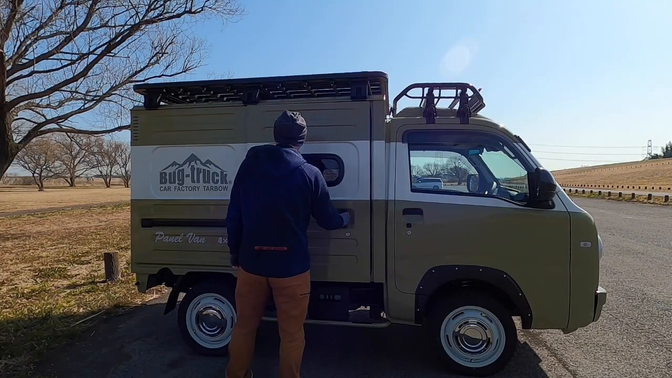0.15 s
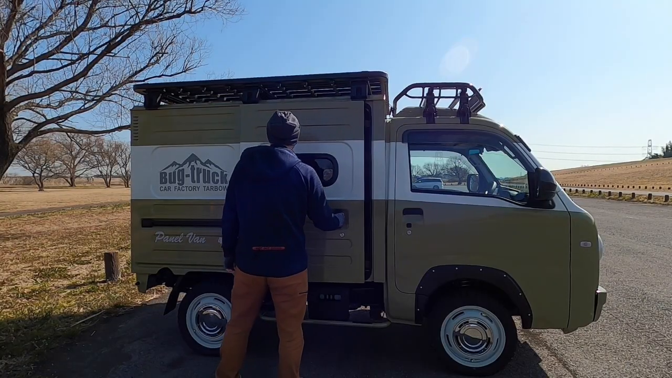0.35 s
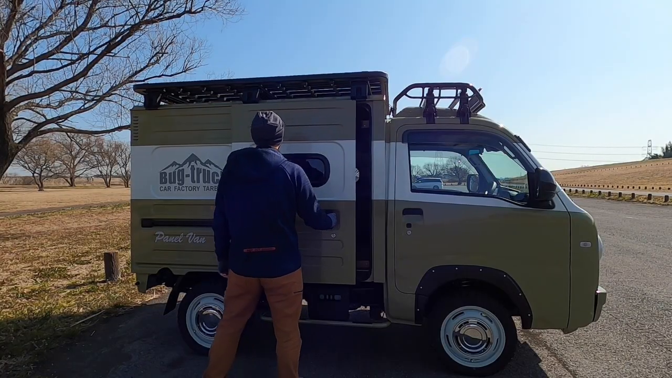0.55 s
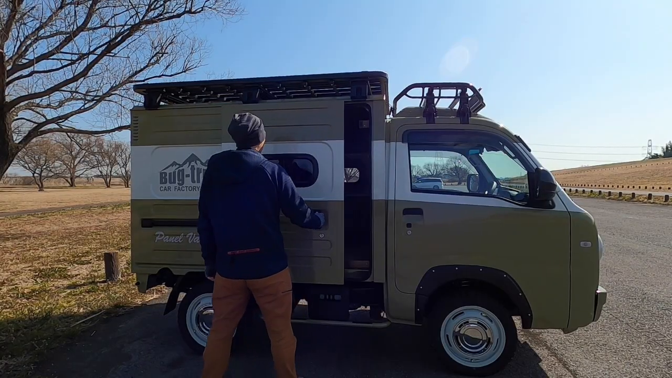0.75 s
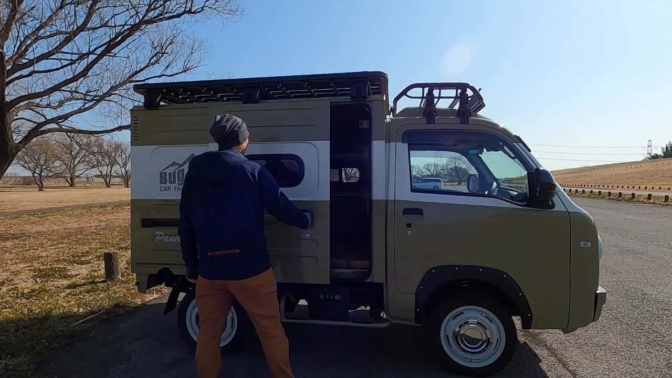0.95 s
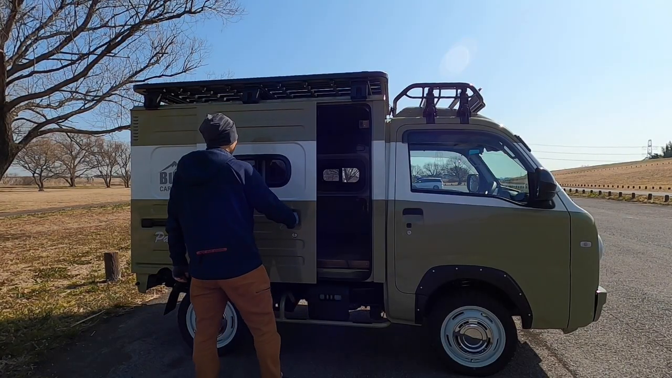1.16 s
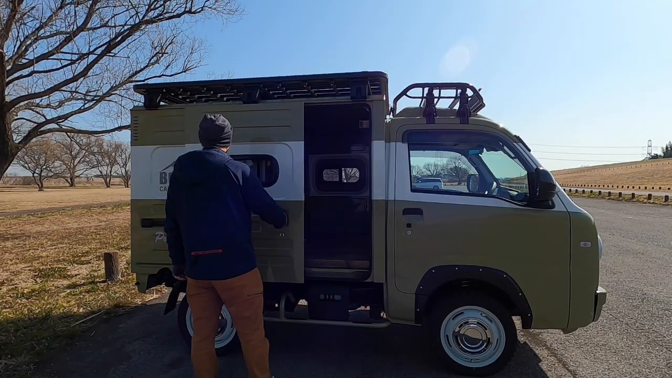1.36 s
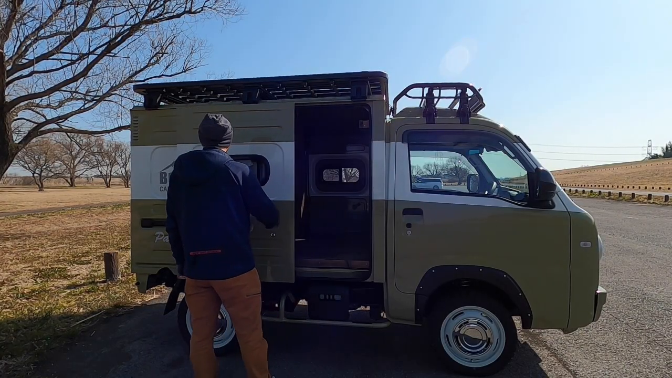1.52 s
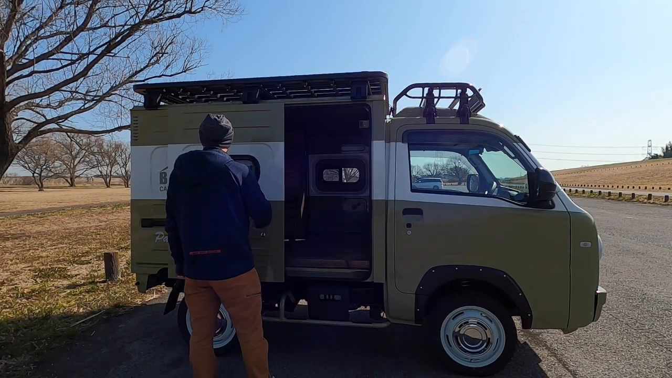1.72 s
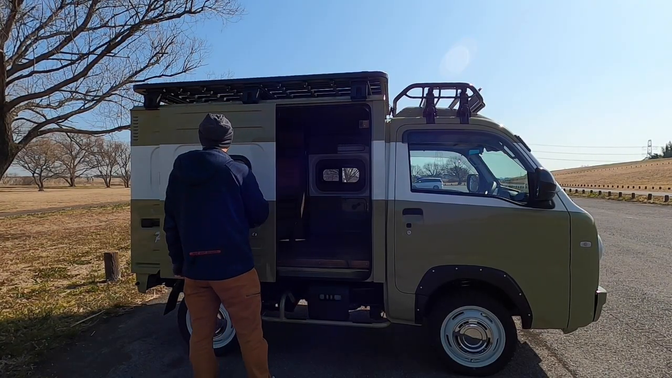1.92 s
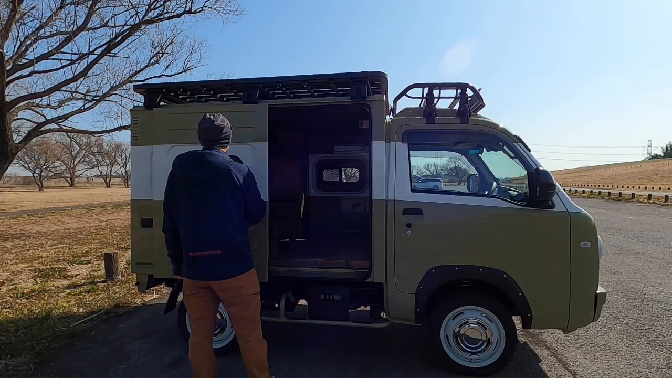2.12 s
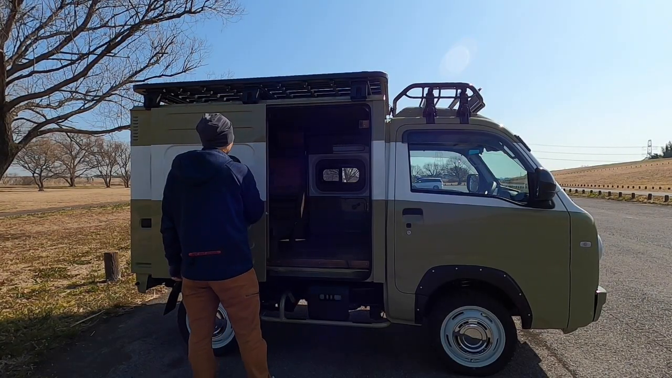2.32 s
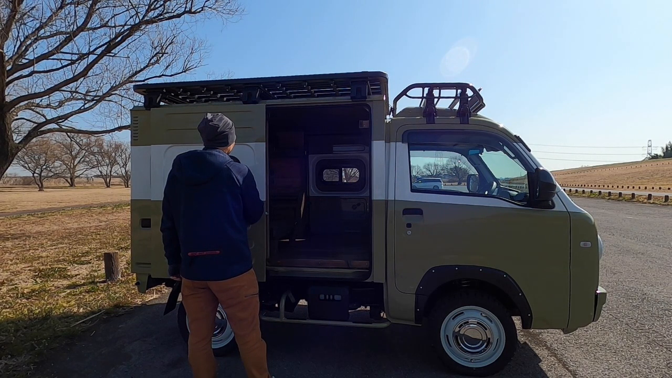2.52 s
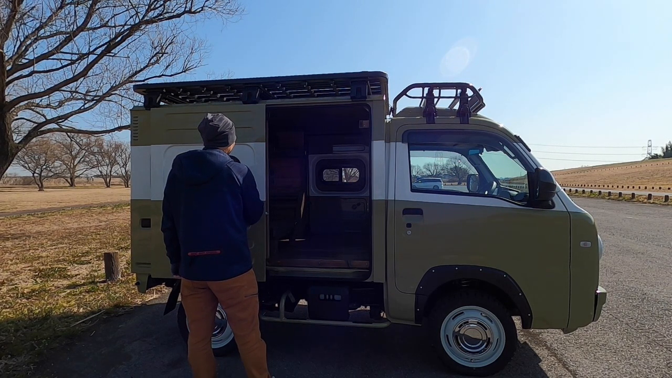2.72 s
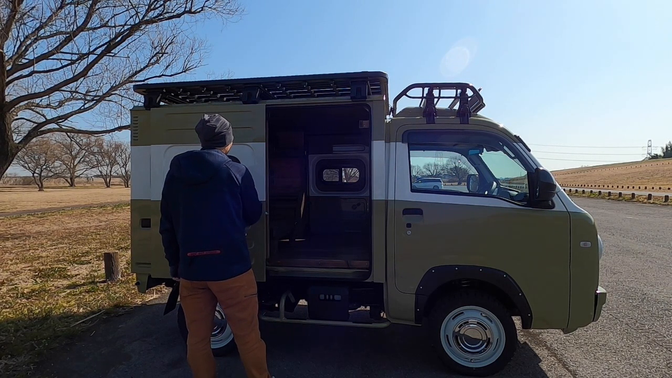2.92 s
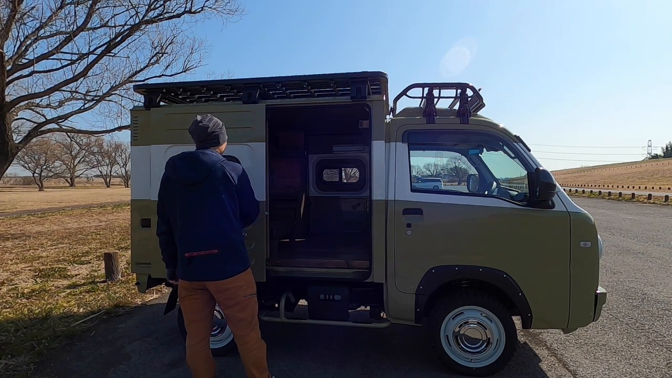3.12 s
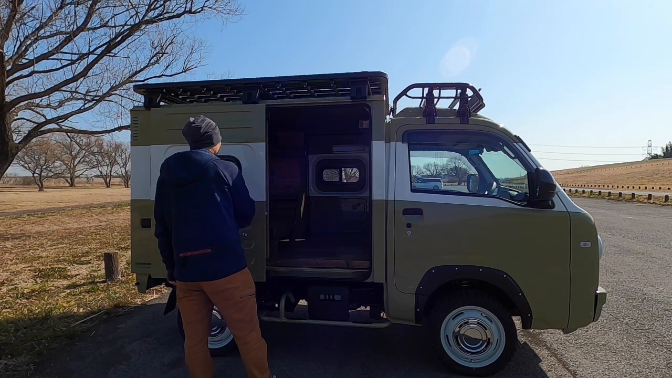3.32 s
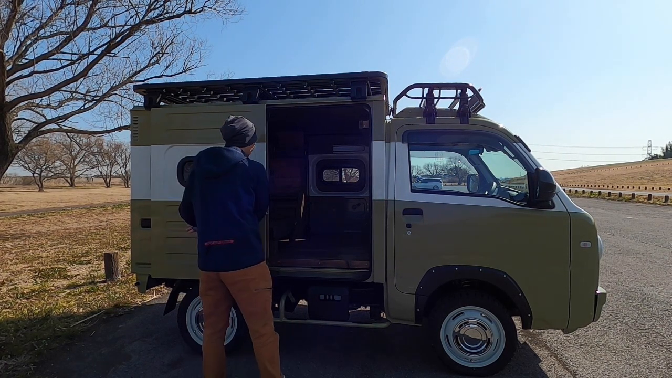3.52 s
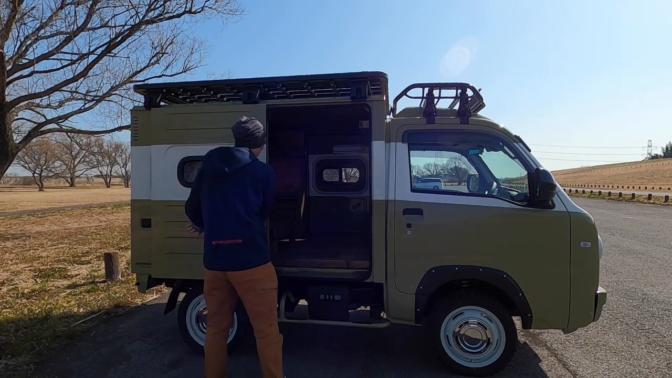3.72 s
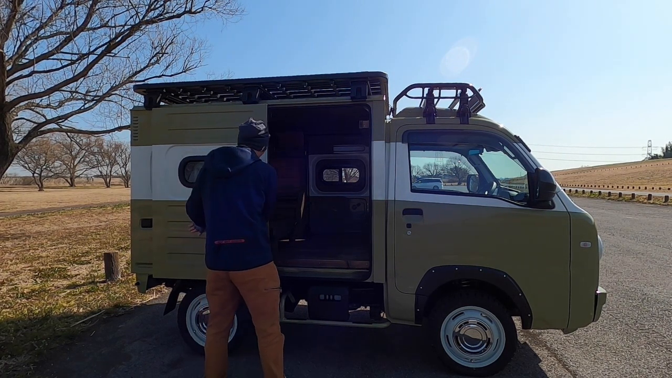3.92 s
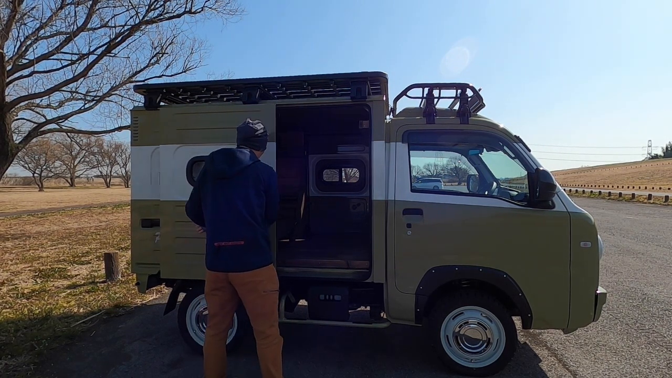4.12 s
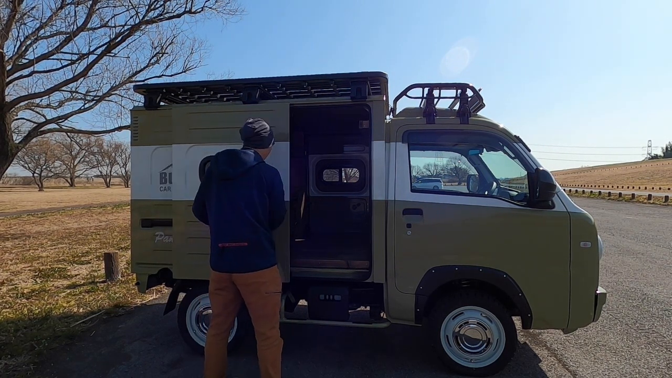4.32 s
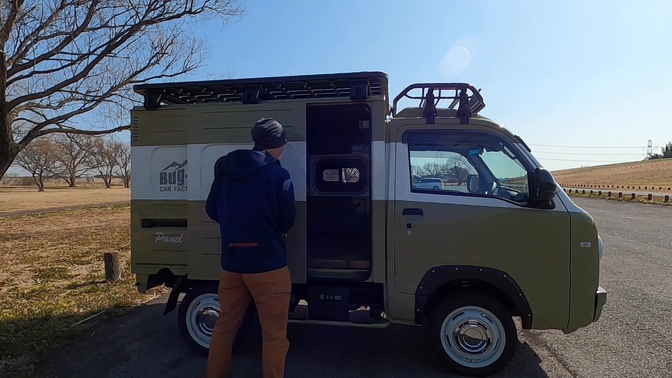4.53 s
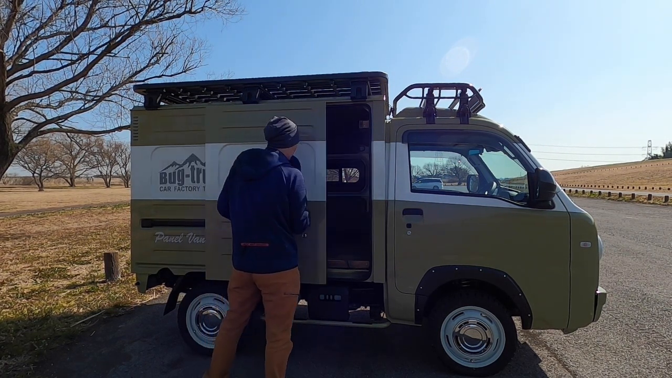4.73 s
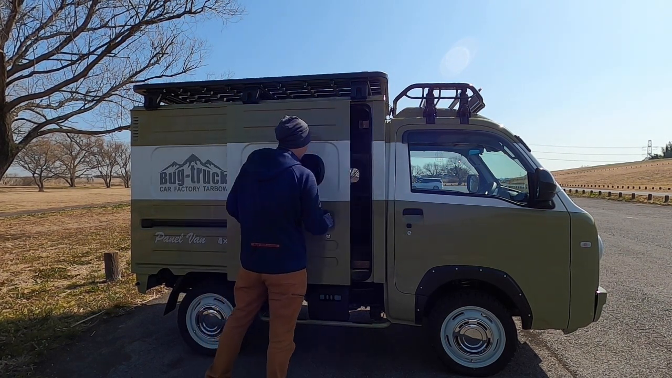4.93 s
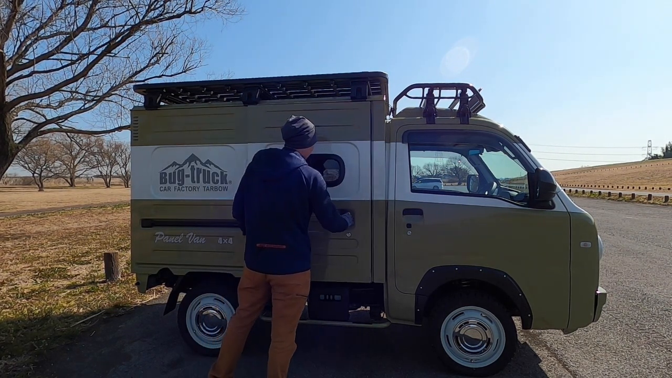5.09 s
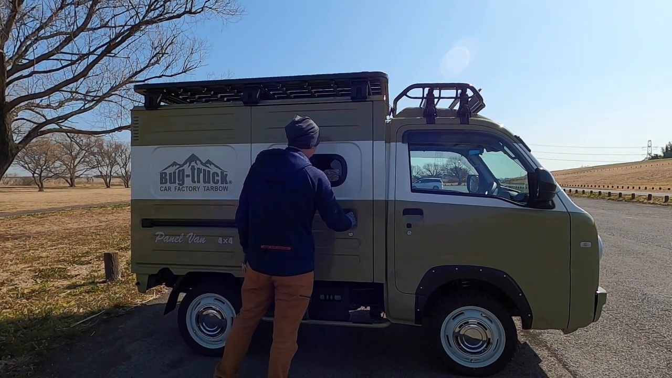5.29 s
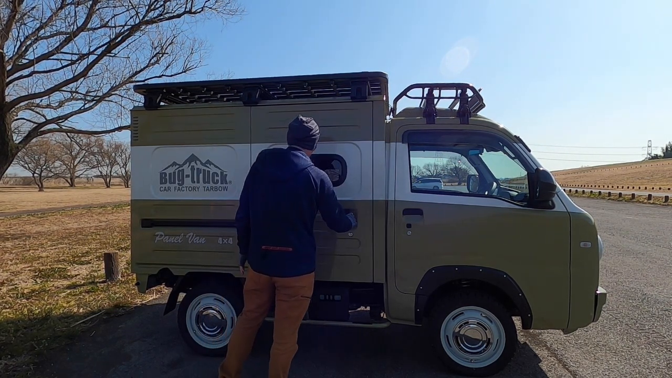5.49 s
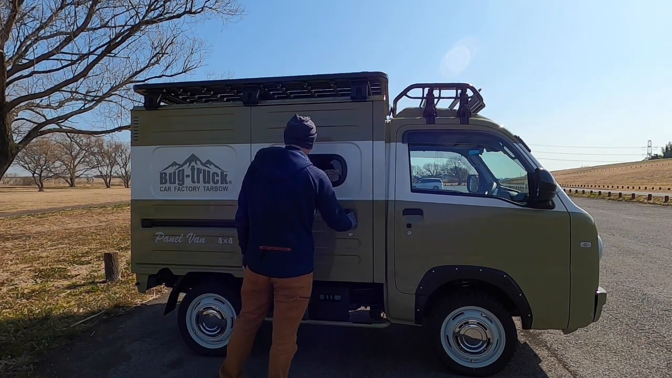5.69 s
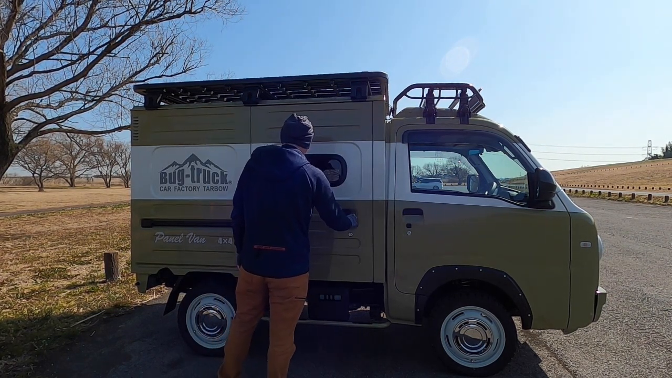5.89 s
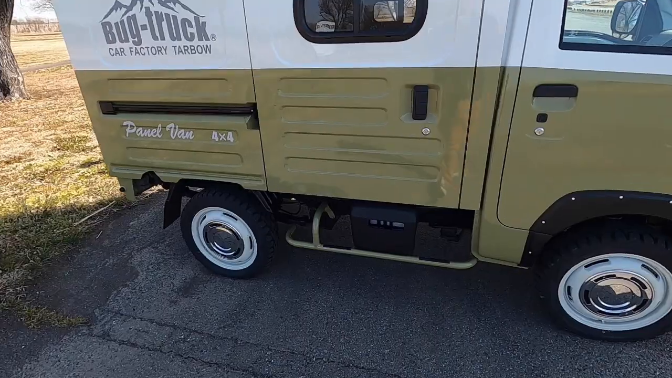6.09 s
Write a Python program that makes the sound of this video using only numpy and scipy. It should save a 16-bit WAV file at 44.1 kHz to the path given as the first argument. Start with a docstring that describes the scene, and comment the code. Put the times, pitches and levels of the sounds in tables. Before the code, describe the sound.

A van's sliding door unlatches, rolls open and knocks against its stop, then rolls back and slams shut over low wind.

```python
"""An open park, a few metres from the steel sliding door of a small van.
The latch lets go, the door rolls back and knocks into its stop; then it rolls forward faster and slams.
Impacts excite the modes of the door and the air in the cargo box; the rollers drive those of the rail.
A jacket rustles, two dry ticks sound, and two faint calls, probably a far bird, follow the slam.
Low wind, a far road and an engine hum lie underneath; a faint hiss enters at the very end."""
import sys
import numpy as np
from scipy import signal
from scipy.fft import rfft, irfft
from scipy.io import wavfile
from scipy.ndimage import uniform_filter1d, map_coordinates

SR = 44100
rng = np.random.default_rng(int(sys.argv[2]) if len(sys.argv) > 2 else 0)


def store_pcm(level_fs):
    """Save levels as 16-bit WAV."""
    pcm = np.round(np.clip(level_fs, -1, 1) * 32767).astype(np.int16)
    wavfile.write(sys.argv[1], SR, np.atleast_2d(pcm).T)


N = 271215


def amp(db):
    """Converts a level in decibels to an amplitude ratio."""
    return 10 ** (np.asarray(db) / 20)


def unit_rms(x):
    """Normalises a signal to rms 1."""
    return x / np.sqrt(np.mean(x ** 2) + 1e-20)


def curve_at(points, hz):
    """Interpolates a table on a logarithmic frequency axis."""
    f, value = np.transpose(points)
    return np.interp(np.log(hz + 1), np.log(f + 1), value)


def add(mix, start_s, sound):
    """Superposition: adds a sound to the mix from start_s on."""
    part = mix[:, max(round(start_s * SR), 0):][:, :sound.shape[-1]]
    part += sound[..., :part.shape[1]]


def bin_hz(size):
    """Frequencies of the Fourier transform of size samples."""
    return np.fft.rfftfreq(size, 1 / SR)


def crossover(centres, hz):
    """Complementary bands: overlapping gains that sum to one."""
    return [np.sin(np.pi / 2 * curve_at(np.c_[centres, one], hz)) ** 2 for one in np.eye(len(centres))]


def resonance(hz, centre_hz, width_hz):
    """Lorentzian peak of height 1, with width_hz its full width at half height."""
    return 1 / (1 + (2 * (hz - centre_hz) / width_hz) ** 2)


def drift(cutoff_hz):
    """Slow random fluctuation: low-passed noise of rms 1."""
    return unit_rms(irfft(rfft(rng.standard_normal(N)) / (1 + (bin_hz(N) / cutoff_hz) ** 4), N))


# Correlation between the two microphones: frequency_hz, correlation_ratio
COHERENCE = [(30, 1), (250, 1), (1000, 0.92), (2000, 0.9), (4000, 0.91), (8000, 0.55), (13000, .7)]
def stereo_noise(gain, size, coherence=1):
    """Partial coherence: coloured noise at two microphones, less alike toward the treble."""
    correlation = np.clip(coherence * curve_at(COHERENCE, bin_hz(size)), 0, 1)
    mid, side = rfft(rng.standard_normal((2, size))) * np.sqrt([1 + correlation, 1 - correlation])
    return irfft(np.array([mid + side, mid - side]) * gain, size)


def noise_bed(spectrum, coherence=1):
    """Spectral shaping: steady stereo noise of rms 1, as long as the scene."""
    return unit_rms(stereo_noise(amp(curve_at(spectrum, bin_hz(N))), N, coherence))


# Spectrum of the wind: frequency_hz, density_db
WIND_SPECTRUM = [(11, -31.5), (18, 0.5), (54, 2), (92, -2), (123, -5.5), (151, -12.5), (189, -12.5),
                 (243, -21), (285, -28.5), (314, -25.5), (800, -56), (1040, -86), (1760, -120)]
def wind(breeze_db=-34, draught_db=4.5, gust_db=2.0):
    """Turbulence: gusty low noise, raised by the door's draught (draught_db at 1 m/s)."""
    speed = door_speed(OPENING_SPEED) + door_speed(SHUTTING_SPEED)
    level_db = breeze_db + draught_db * speed ** 2 + gust_db * drift(54)
    return noise_bed(WIND_SPECTRUM, coherence=0.97) * amp(level_db)


# Spectrum of distant traffic: frequency_hz, density_db
ROAD_SPECTRUM = [(400, -1.5), (750, -9.5), (1100, 2), (1500, -1.5), (2100, -9), (3000, -20), (4500, -29.5),
                 (8000, -37), (15000, -49.5)]
# Traffic coming and going: time_s, level_db
ROAD_ENVELOPE = [(0, -59.5), (3.3, -61), (3.6, -56), (5.7, -65), (5.93, -64), (5.96, -70.5), (6.15, -70.5)]
def far_road():
    """Broadband traffic noise under a slowly changing envelope."""
    level_db = np.interp(np.arange(N) / SR, *np.transpose(ROAD_ENVELOPE))
    return noise_bed(ROAD_SPECTRUM) * amp(level_db)


# Harmonics of the engine: pitch_hz, relative_db
ENGINE_HARMONICS = [(61.2, -16), (122.4, 3.5), (183.6, -3)]
def engine_hum(quiet_db=-53.0, loud_db=-39.0, waver=0.0054, swell_db=2):
    """A harmonic series, wavering in pitch and level; it is louder between the two ticks."""
    t = np.arange(N) / SR
    clock = np.cumsum(1 + waver * drift(10.9)) / SR
    hum = sum(amp(db + swell_db * drift(3.8)) * np.sin(2 * np.pi * hz * clock)
              for hz, db in ENGINE_HARMONICS)
    between_ticks = (t > DRY_TICKS[0][0]) & (t < DRY_TICKS[1][0])
    level_db = uniform_filter1d(np.where(between_ticks, loud_db, quiet_db), size=1500)
    return unit_rms(hum) * amp(level_db)


def damped_mode(hz, db, rise_s, t60_s):
    """Damped oscillator: a sinusoid that builds up, then falls 60 dB in t60_s."""
    t = np.arange(SR) / SR
    return amp(db - 60 * t / t60_s) * (1 - np.exp(-t / rise_s)) * np.sin(2 * np.pi * hz * t)


# Air modes of the cargo box: start_s, level_db, pitch_hz, rise_s, t60_s
BOX_BOOMS = [(0.113, -7.5, 42, 0.0097, 0.24), (0.2, -12, 31, 0.019, 0.45), (0.193, -22, 96, .008, 0.39),
             (2.286, -21.5, 50.8, 0.0036, 1), (2.345, -21, 121.7, .006, 0.18),
             (2.448, -22.5, 66.3, 0.0033, 0.83), (2.491, -25.5, 110.2, 0.0055, 0.44),
             (5.089, 0, 40.64, 0.011, 0.12), (5.233, -5, 55.2, 0.0021, 0.26),
             (5.233, -13.5, 103.6, .004, 0.23), (5.244, 1.5, 29.03, 0.051, 0.51),
             (5.276, -15.5, 75.1, .005, 0.44)]
def box_booms():
    """Cavity resonance: heavy blows pump the air enclosed in the cargo box."""
    out = np.zeros((2, N))
    for start_s, db, hz, rise_s, t60_s in BOX_BOOMS:
        add(out, start_s, damped_mode(hz, db, rise_s, t60_s))
    return out


# Decay in the thud, body, clang, clink and click bands: centre_hz, rise_s, t60_s, tail_t60_s, tail_db
BAND_DECAYS = [(253, 0.0011, 0.056, 0.5, -6.5), (650, 0.00054, 0.24, 0.35, -27),
               (1590, 0.00039, 0.15, 0.14, -32), (4300, 0.00086, 0.13, 0.16, -16.5),
               (9000, 0.00037, 0.095, 0.12, -23.5)]
# Modes of the door skin and frame: pitch_hz, level_db, t60_s
DOOR_MODES = [(118, -17, .4), (186, -18, .45), (233, -5, .3), (310, -9, .22), (380, -4, .24),
              (446, -1, .21), (613, -4, .18), (762, -12, .22), (821, -15, .2), (935, -12, .24),
              (1012, -12, .17), (1240, -8, .22), (1340, -8, .2), (1446, -8, .21), (1662, -8, .21),
              (1840, -10, .2), (2160, -14, .17), (2295, -13, .19), (2370, -13, .19), (2848, -16, .18),
              (3026, -13, .17), (3150, -14, .17), (3402, -17, .17), (3650, -19, .2)]
# Dense ringing of the steel body: frequency_hz, density_db
STEEL_SPECTRUM = [(40, -0.5), (80, -2), (150, -9.5), (260, -13), (340, -18.5), (480, -21), (620, -24.5),
                  (1000, -22.5), (1600, -16), (2100, -21.5), (3150, -23.5), (4440, -32), (7400, -48),
                  (10000, -61.5), (12000, -74), (15500, -78)]
# Timbre by part struck: thud_db, body_db, clang_db, clink_db, click_db, sheen_db, decay_ratio, crack_db
PART_TIMBRES = {"lock": (11, -2, -3.5, -18, -28, -6, 0.9, -3.5),
                "pin": (-5.5, -4.5, -2.5, 3, -4, 11, 1.2, -2),
                "seam": (-3, -6, 5.5, -6, -22, -3, 1.24, 3.5),
                "panel": (6, -12, -3.5, -15, -22, -6.5, 0.6, -11.5),
                "guide": (4.5, -10.5, -15.5, -10.5, -25, 0, 0.96, -11.5),
                "roller": (-2.5, -12.5, 2.5, -15.5, -28, 7.5, 1, -7.5),
                "latch": (0.5, 0, 0.5, -4.5, -9, -20, 0.7, 1.5),
                "joint": (-1.5, 3.5, 5, -7, -12, 3, 1.1, 12), "bump": (5, 1, -4.5, -18, -32, -4, 0.2, -7),
                "rail": (2.5, 3.5, -2, 6, -1, -26, 1.13, -0.5),
                "catch": (-1.5, -14, 6.5, -2, -6.5, -5, 1.3, -2.5),
                "tongue": (2.5, -5.5, -9, 1, -1, -22.5, 4.5, -5),
                "hook": (1, -3.5, -4, -3, -10.5, -8, 2.4, 5.5),
                "stop": (10, 5.5, 0.5, -7, -30, -4, 1.02, -2),
                "spring": (16.5, 5, -0.5, -7, -19.5, -1, 0.7, -14),
                "frame": (2.5, 1.5, 1.5, -6, -17.5, 1.5, 1.15, -0.5)}
def impact(part, strength_db, hardness_db, modes_db=-2, scatter_db=2, dense_db=7, crack_s=0.0045):
    """Impulse response: distinct modes within dense ringing, each band with a decay and a tail."""
    size, onset = SR // 3, slice(SR // 50)
    t, hz = np.arange(size) / SR, bin_hz(size)
    *colour_db, sheen_db, decay_ratio, crack_db = PART_TIMBRES[part]
    crack = 1 + amp(crack_db) * np.exp(-t / crack_s)  # metal on metal briefly stands out
    centres = np.array([row[0] for row in BAND_DECAYS])
    tilt_db = hardness_db * np.log2(centres / np.median(centres))  # a harder blow is brighter
    levels_db = strength_db + np.array(colour_db) + tilt_db

    mode_hz, mode_db, t60_s = np.transpose(DOOR_MODES)[:, :, None]
    weights = amp(mode_db + scatter_db * rng.standard_normal(mode_hz.shape))  # varies with the spot hit
    tones = np.sin(2 * np.pi * (mode_hz * t + rng.random(mode_hz.shape)))
    modes = (weights * amp(-60 * t / (t60_s * decay_ratio)) * tones).sum(0)
    mode_spectrum = rfft(amp(modes_db) * modes / modes[onset].std(), 2 * size)

    top_db = sheen_db * np.interp(hz, [7500, 11500], [0, 1])
    steel = amp(curve_at(STEEL_SPECTRUM, hz) + top_db) * hz ** 2 / (hz ** 2 + 110 ** 2)
    dense_spectrum = rfft(amp(dense_db) * unit_rms(stereo_noise(steel, size)))

    out = 0
    bands = zip(levels_db, crossover(centres, hz), crossover(centres, bin_hz(2 * size)), BAND_DECAYS)
    for level_db, band, padded_band, (_, rise_s, early_t60_s, tail_t60_s, tail_db) in bands:
        early = amp(-60 * t / (early_t60_s * decay_ratio))
        tail = amp(tail_db - 60 * t / (tail_t60_s * decay_ratio))
        dense = irfft(dense_spectrum * band) * np.hypot(early, tail)
        distinct = irfft(mode_spectrum * padded_band)[:size]
        ringing = (dense + distinct) * (1 - np.exp(-t / rise_s)) ** 2 * crack
        out = out + amp(level_db) * ringing / ringing[:, onset].std()
    return out


# Blows on the door: start_s, part, strength_db, hardness_db_per_octave
DOOR_BLOWS = [(.115, "lock", -38.5, 2.5), (.121, "lock", -37, -2), (.127, "lock", -34, -1),
              (.149, "roller", -39.5, -1), (0.178, "pin", -59, -3.5), (.187, "panel", -40, 0.5),
              (.216, "roller", -41, -2.5), (.223, "roller", -47.5, -4), (0.368, "latch", -37, 0),
              (0.3701, "latch", -35, -0.5), (0.676, "rail", -64, 1.5), (0.804, "rail", -57.5, 0.5),
              (1.157, "seam", -47.5, -2), (1.283, "guide", -43.5, -1.5), (1.402, "joint", -46, 0.5),
              (2.271, "catch", -45, 0.5), (2.318, "hook", -39, 0.5), (2.348, "pin", -59.5, -1),
              (2.392, "stop", -34, 0), (2.399, "bump", -32.5, 1.5), (2.416, "spring", -45, 1.5),
              (2.425, "spring", -43.5, 1), (2.446, "spring", -55.5, 1), (2.474, "spring", -51.5, -1),
              (2.577, "rail", -70, -3), (2.727, "seam", -65.5, -4), (4.143, "rail", -58, -4.5),
              (4.357, "rail", -60, 1.5), (4.439, "rail", -51, -2), (4.522, "rail", -53, 0.5),
              (4.682, "rail", -50.5, -2), (4.717, "seam", -47.5, 3), (4.73, "seam", -43.5, 1),
              (5.057, "tongue", -40.5, -2), (5.069, "roller", -34, -4), (5.076, "guide", -27.5, -1),
              (5.113, "rail", -33.5, -2.5), (5.231, "frame", -25.5, -3), (5.236, "frame", -25, 0.5),
              (5.247, "frame", -28.5, 2.5), (5.256, "pin", -45, 2), (5.276, "guide", -27.5, 1),
              (5.289, "pin", -51.5, 0.5), (5.327, "pin", -55.5, 0), (5.358, "frame", -51, 1.5),
              (5.372, "frame", -52.5, 1)]
# Each part's own modes: pitch_hz, above_blow_db, t60_s
FITTING_MODES = {"lock": [(120.3, 18, 0.052), (210, 19, 0.15), (307, 14.5, 0.1), (468, 15, 0.097),
                 (750, 8, 0.16), (1017, 3, 0.031), (1228, 18, 0.036)], "panel": [(119.5, 6, 0.64),
                 (215, 16, 0.083)], "guide": [(207, 14.5, 0.11), (241, 15.5, 0.14), (553, 6, 0.023)],
                 "roller": [(1696, 9, 0.041), (1890, 15.5, 0.019)], "latch": [(183, 9.5, 0.36),
                 (494, 3.5, 0.086), (630, 6.5, 0.082), (875, 1, 0.18), (1190, -7, 0.11), (1320, 16, 0.014),
                 (1508, 22, 0.013), (1700, -9.5, 0.18), (2345, 7, 0.067), (3136, 0.5, 0.068),
                 (3250, 16, 0.041), (3950, 5, 0.031), (4780, 8, 0.032), (5790, 6.5, 0.028),
                 (7200, 0.5, 0.021)], "bump": [(422, 8.5, 0.12), (650, 6.5, 0.12), (1118, 4, 0.053)],
                 "rail": [(3070, 4.5, .05), (5400, 5.5, .04), (7050, -4, .04)], "pin": [(7700, 6.5, .03)],
                 "joint": [(663, 21, 0.039), (1770, 9, 0.018), (2350, 16.5, 0.024), (2860, 2, 0.018)],
                 "catch": [(1046, 5, 0.22), (1510, -6, 0.21), (1780, 7, 0.059), (2880, 13, 0.041),
                 (3400, 4, 0.03)], "tongue": [(5400, 10, .04), (6000, 8, .04)], "hook": [(1550, 9.5, 0.2),
                 (1850, 3, 0.21), (2869, -6, .14), (3180, 3, .045)], "stop": [(540, 2, 0.064),
                 (706, 4.5, 0.16), (903, 0.5, 0.2), (1095, 8, 0.072), (1220, 7, 0.067), (1610, -7, 0.065),
                 (2420, 8.5, 0.054), (2520, 12.5, 0.023), (3630, -1.5, 0.053)],
                 "spring": [(359, 12.5, 0.32), (1937, 13.5, 0.069), (2800, 1, .06), (3570, 0.5, 0.09),
                 (3780, 1.5, 0.088), (4450, -7, 0.08), (4550, -7, 0.09)], "frame": [(119, 8.5, 0.43),
                 (237.1, 5.5, 0.28), (448.4, 4, 0.17), (1260, -1.5, .1), (1636, 1, 0.1)]}
def knocks(rise_s=0.0011):
    """Free vibration: each blow rings both the door and the part that it hits."""
    out = np.zeros((2, N))
    for start_s, part, strength_db, hardness_db in DOOR_BLOWS:
        add(out, start_s, impact(part, strength_db, hardness_db))
        for hz, db, t60_s in FITTING_MODES.get(part, []):
            add(out, start_s, damped_mode(hz, strength_db + db, rise_s, t60_s))
    return out


def door_speed(run):
    """Inertia: the door's mass smooths every change in its speed, given in m/s at each sample."""
    speed = np.interp(np.arange(N) / SR, *np.transpose(run), left=0, right=0)
    return np.maximum(uniform_filter1d(speed, size=1000), 1e-4)


def contact_noise(grit_db=-9, specks_per_s=900, spread_db=-11.5, t60_s=0.045):
    """Roughness excitation: steady noise plus a decaying burst for each crushed speck of grit."""
    crushed = rng.random(N) < specks_per_s / SR
    specks = crushed * amp(spread_db * np.minimum(rng.exponential(1, N), 3.5))
    power_decay = amp(-120 * np.arange(SR // 8) / SR / t60_s)
    burst_power = abs(signal.oaconvolve(specks ** 2, power_decay)[:N])
    return stereo_noise(1, N) * np.sqrt(1 + amp(2 * grit_db) * burst_power / burst_power.mean())


def patches(shape, size):
    """A random field of rms 1, smoothed over size = (frequency bins, time frames)."""
    kernel = np.outer(*map(signal.windows.hann, size))
    return unit_rms(signal.oaconvolve(rng.standard_normal(shape), kernel, "same"))


def wander(x, flicker_db=2.0, linger_db=1.7):
    """Moving excitation: as the rollers travel, single resonances swell and fade, some lingering."""
    hz, _, frames = signal.stft(x, SR, nperseg=1024, noverlap=768)
    depth = np.interp(hz, [250, 1200], [.25, 1])[:, None]  # the low rumble stays even
    swell_db = flicker_db * patches(frames.shape[1:], size=(7, 13))
    swell_db += linger_db * patches(frames.shape[1:], size=(5, 55))
    return signal.istft(frames * amp(depth * swell_db), nperseg=1024, noverlap=768)[1][:, :N]


def bend(x, depth=.005):
    """Frequency modulation: all resonances glide together as the load shifts along the rail."""
    position = np.arange(N) + np.cumsum(depth * drift(4))
    return np.array([map_coordinates(side, [position], order=3, mode="mirror") for side in x])


# Broad response of the rail: frequency_hz, density_db
RAIL_SPECTRUM = [(35, -26), (60, 21.5), (124, 0.5), (151, 2.5), (306, -4), (355, -7.5), (606, -12),
                 (818, -24), (1400, -35.5), (1850, -34.5), (2150, -34), (3150, -36.5), (4740, -49),
                 (6680, -49), (9500, -65.5), (10600, -78), (13000, -86.5), (22000, -120)]
# Resonances of rail and rollers: centre_hz, width_hz, boost_db
RAIL_RESONANCES = [(212, 160, 6.5), (358, 58, 2), (402, 62, 3), (673, 14, 5.5), (930, 29, 3.5),
                   (1164, 120, 6.5), (1415, 170, 9.5), (1800, 150, 7), (2300, 120, 2), (2860, 350, 3.5),
                   (2790, 120, 4), (3215, 140, 9), (3640, 110, 4.5), (4080, 190, 2), (5450, 140, 6),
                   (5870, 380, 7.5), (6630, 260, 5.5), (7660, 230, 7), (8730, 600, 7.5)]
def rail_response(hz, ripple_db=2.1, spacing_hz=32):
    """Transfer function of the rail: main peaks, rippled by the door's countless lesser resonances."""
    peaks_db = sum(db * resonance(hz, centre, width) for centre, width, db in RAIL_RESONANCES)
    grid = np.arange(0, SR / 2, spacing_hz)
    lesser_db = ripple_db * np.interp(hz, grid, rng.standard_normal(len(grid))) * hz / (hz + 200)
    high_pass = hz ** 2 / (hz ** 2 + 130 ** 2)
    return amp(curve_at(RAIL_SPECTRUM, hz) + peaks_db + lesser_db) * high_pass


# The door pulled back and left to coast, then pushed shut ever faster: time_s, speed_m_per_s
OPENING_SPEED = [(.16, 0.5), (.24, 0.35), (.3, 0.31), (.335, 0.18), (.39, 0.44), (.45, 0.29), (.56, .37),
                 (.72, 0.4), (.93, 0.55), (1.2, 0.49), (1.55, 0.42), (2.1, 0.35), (2.4, 0.37), (2.5, 0.22)]
SHUTTING_SPEED = [(3.88, 0.18), (3.98, 0.17), (4.07, 0.27), (4.12, 0.26), (4.22, 0.41), (4.33, 0.61),
                  (4.52, 0.61), (4.92, 1.2), (5.08, 1.4), (5.17, 1.1), (5.23, .97), (5.27, 0.17)]
# Rumble, growl, grind, scrape and hiss bands of the rollers: centre_hz
ROLLER_BANDS = (250, 550, 1300, 3000, 6500)
# One row a band: level_db (at 1 m/s), db_per_speed_doubling, db_per_metre_travelled
OPENING_LEVELS = [(-39.5, 1.5, 4.5), (-44, 4.5, 5.5), (-40, 8.5, -1), (-41, 13, 0.5), (-46, 14.5, -6.5)]
SHUTTING_LEVELS = [(-31, 2.1, -4), (-39, 2.7, 4.5), (-39, 7.1, 0.5), (-48, 8.2, -0.5), (-55.5, 10, -1)]
def rolling(run, band_levels, judder_db=0.92, crawl_m_per_s=0.35):
    """Forced vibration: the rollers drive the rail's resonances, louder and brighter with speed."""
    hz, speed = bin_hz(N), door_speed(run)
    travel_m = np.cumsum(speed) / SR
    response = rail_response(hz)
    force = wander(contact_noise()) * amp(judder_db * drift(22))
    spectrum = rfft(bend(irfft(rfft(force) * response, N)))
    out = 0
    for band, (db, growth_db, travel_db) in zip(crossover(ROLLER_BANDS, hz), band_levels):
        rms_above_bass = irfft(spectrum * band * (hz > 170), N).std()
        level_db = db + growth_db * np.log2(speed) + travel_db * travel_m
        out = out + irfft(spectrum * band, N) / rms_above_bass * amp(level_db)
    return out / np.hypot(1, (crawl_m_per_s / speed) ** 4)  # below a crawl the rollers fall silent


# Shaking after the heavy blows: start_s, level_db, hardness_db_per_octave, t60_s
DOOR_RATTLES = [(.21, -51.5, -0.5, 0.39), (2.43, -54, -0.5, 0.61), (5.292, -45.5, 1, 0.35)]
def rattles(knocks_per_s=170, count=80, uneven_db=3):
    """Repeated impact: the door shakes in its fittings, a dying run of uneven knocks on the panel."""
    out = np.zeros((2, N))
    for start_s, db, hardness_db, t60_s in DOOR_RATTLES:
        delays = (np.arange(count) + rng.random(count)) / knocks_per_s
        signs = rng.choice([-1, 1], count)
        sizes = signs * amp(uneven_db * rng.standard_normal(count) - 60 * delays / t60_s)
        knock = impact("panel", db, hardness_db)
        for delay, size in zip(delays, sizes):
            add(out, start_s + delay, size * knock)
    return out


# Swells of noise: peak_s, timbre, level_db, swell_s, t60_s The ones at 0.367 s and 5.228 s are brief swells
# just before a clack (the latch, then the slam); the others are parts rubbing.
NOISE_SWELLS = [(.25, "guide", -69.5, .04, .6), (.32, "guide", -70.5, .04, .08),
                (.367, "latch", -47, .013, .02), (1.71, "detent", -37, .07, .12),
                (2.375, "detent", -30.5, .05, 0.48), (2.381, "buffer", -28, .016, 0.071),
                (2.427, "spring", -38, .012, .15), (5.19, "seal", -30.5, .06, .15),
                (5.228, "latch", -38.5, .03, .05)]
# Spectral peaks of each timbre: centre_hz, width_hz, level_db
SWELL_PEAKS = {"guide": [(5450, 300, 0), (5900, 140, 2), (7550, 400, -3), (8750, 160, -9)],
               "latch": [(1500, 1100, 0), (3300, 1500, -2), (5600, 1800, -12)], "detent": [(250, 160, 0),
               (410, 160, -3), (640, 160, -8)], "spring": [(930, 160, 3), (1250, 200, -1), (1930, 220, 0),
               (3720, 330, -4), (4550, 240, -8)], "buffer": [(650, 150, 5), (1120, 200, -2.5),
               (1650, 300, -10)], "seal": [(480, 140, 0)]}
def noise_swells():
    """Resonant filtering: noise with a few broad peaks rises linearly, then decays exponentially."""
    out, size = np.zeros((2, N)), SR // 2
    t, hz = np.arange(size) / SR, bin_hz(size)
    for peak_s, timbre, db, swell_s, t60_s in NOISE_SWELLS:
        response = sum(amp(peak_db) * resonance(hz, centre, width)
                       for centre, width, peak_db in SWELL_PEAKS[timbre])
        envelope = np.minimum(t / swell_s, 1) * amp(db - 60 * np.maximum(t - swell_s, 0) / t60_s)
        add(out, peak_s - swell_s, envelope * unit_rms(stereo_noise(response, size)))
    return out


# Two faint ticks: start_s, peak_db
DRY_TICKS = [(3.4019, -29.5), (5.9425, -30)]
def ticks(decay_s=0.0019):
    """Exponential pulses: a step that dies without oscillating is heard as a dry tick."""
    out = np.zeros((2, N))
    pulse = np.exp(-np.arange(SR // 50) / SR / decay_s)
    for start_s, db in DRY_TICKS:
        add(out, start_s, amp(db) * pulse)
    return out


# A sleeve reaching for the door and pushing: start_s, level_db, length_s
SLEEVE_MOVES = [(3.41, -68.5, 0.2), (3.942, -67, 0.15), (4.028, -59.5, 0.089)]
# Spectrum of rubbing cloth: frequency_hz, density_db
CLOTH_SPECTRUM = [(800, -8.5), (2500, 8), (4500, -10), (7500, -8), (10000, -30), (15000, -32)]
def jacket_rustles(crinkle_db=3):
    """Friction noise of cloth, amplitude-modulated into short uneven swishes."""
    out = np.zeros((2, N))
    cloth = unit_rms(noise_bed(CLOTH_SPECTRUM) * amp(crinkle_db * drift(55)))
    for start_s, db, length_s in SLEEVE_MOVES:
        swell = np.sqrt(np.hanning(int(length_s * SR)))
        add(out, start_s, amp(db) * swell * cloth[:, round(start_s * SR):][:, :len(swell)])
    return out


# Two short, faint calls, probably a far bird: start_s, level_db, top_pitch_hz, length_s
FAR_CALLS = [(5.452, -59, 942, 0.056), (5.655, -64, 970, 0.038)]
def far_calls(harmonics_db=(-12, 0, 0, -10, -20, -21, -24, -28), roughness=.07):
    """Frequency modulation: a harmonic tone arches in pitch and level, made hoarse by pitch jitter."""
    out = np.zeros((2, N))
    for start_s, db, top_hz, length_s in FAR_CALLS:
        arch = np.sin(np.linspace(0, np.pi, int(length_s * SR)))
        jitter = roughness * unit_rms(uniform_filter1d(rng.standard_normal(len(arch)), 40))
        cycles = np.cumsum(top_hz * (.75 + .25 * arch + jitter)) / SR
        tone = sum(gain * np.sin(2 * np.pi * k * cycles) for k, gain in enumerate(amp(harmonics_db), 1))
        add(out, start_s, amp(db) * unit_rms(tone * arch))
    return out


# Spectrum of the closing hiss: frequency_hz, density_db
HISS_SPECTRUM = [(300, -33), (520, 12), (800, 3), (2500, -7), (4000, -6.5), (7000, -10), (8200, -11),
                 (9200, -27), (15000, -27.5)]
def faint_hiss(level_db=-75.5):
    """Gated noise: a steady hiss sets in at the second tick."""
    return noise_bed(HISS_SPECTRUM) * amp(level_db) * (np.arange(N) / SR > DRY_TICKS[1][0])


# Level difference between the microphones: frequency_hz, left_minus_right_db
LEVEL_DIFFERENCE = [(60, 1), (95, 0), (150, 1.5), (240, 0.5), (380, 0.5), (600, 0.5), (950, -0.5),
                    (1510, 0.5), (2400, 2), (3810, 1.5), (6040, -3), (9580, 0.5)]
# Phase difference between the microphones: frequency_hz, left_lead_rad
PHASE_DIFFERENCE = [(30, 0.055), (250, 0.13), (1000, -.15), (2700, -0.7), (5500, -.6), (8000, -0.7),
                    (13000, -1.7)]
def scene():
    """Superposition of all sources at two microphones that differ in level and phase."""
    door = box_booms() + knocks() + rattles() + noise_swells()
    door += rolling(OPENING_SPEED, OPENING_LEVELS) + rolling(SHUTTING_SPEED, SHUTTING_LEVELS)
    small_sounds = ticks() + far_calls() + jacket_rustles()
    background = wind() + far_road() + engine_hum() + faint_hiss()
    hz = bin_hz(N)
    left = amp(curve_at(LEVEL_DIFFERENCE, hz) / 2) * np.exp(1j * curve_at(PHASE_DIFFERENCE, hz) / 2)
    return irfft(rfft(door + small_sounds + background) * np.array([left, 1 / left]), N)


def record(dry, cutoff_hz=15700):
    """Soft saturation rounds the peaks just under full scale; a low-pass filter limits the band."""
    rounded = dry / (1 + dry ** 8) ** (1 / 8)
    low_pass = signal.firwin(511, cutoff_hz, window=("kaiser", 9), fs=SR)
    return signal.oaconvolve(rounded, low_pass[None], "same")


dry = scene()
out = record(dry)
store_pcm(out)
```